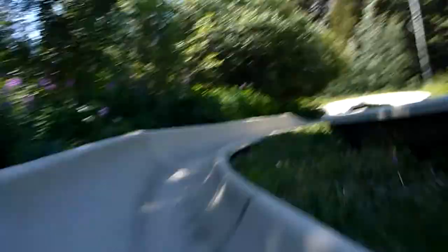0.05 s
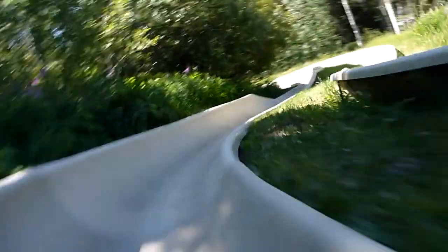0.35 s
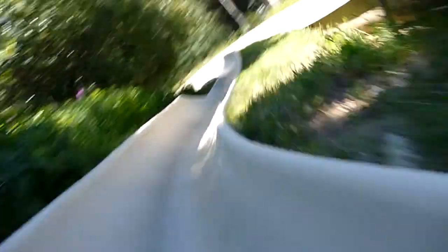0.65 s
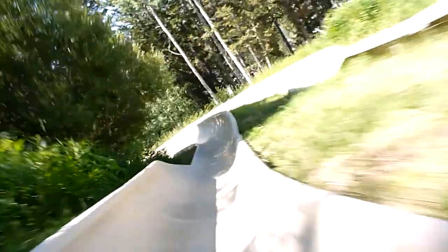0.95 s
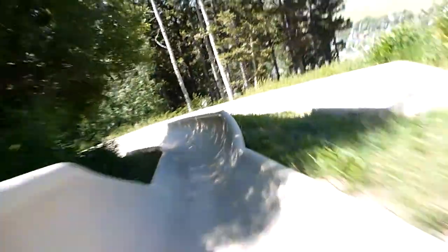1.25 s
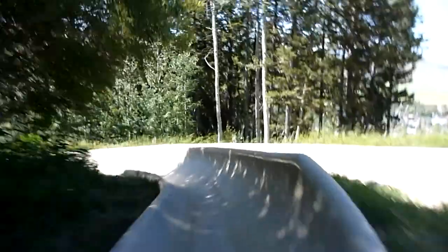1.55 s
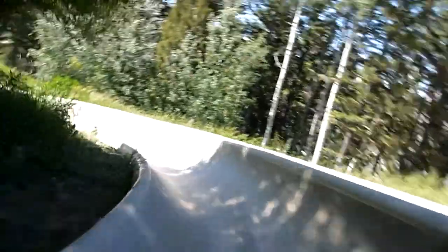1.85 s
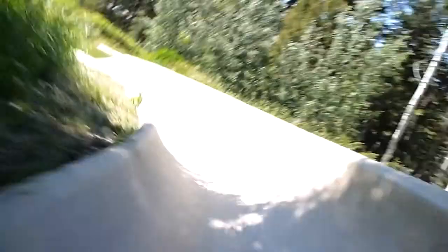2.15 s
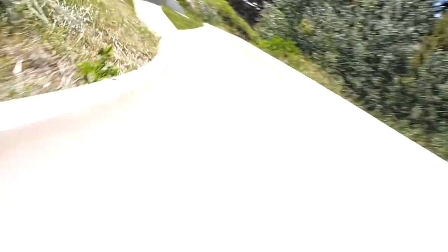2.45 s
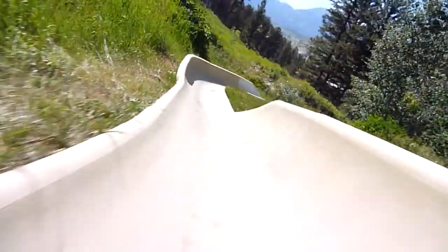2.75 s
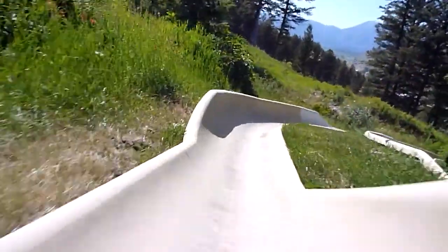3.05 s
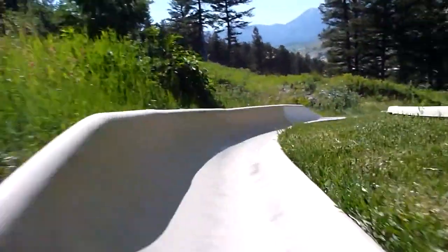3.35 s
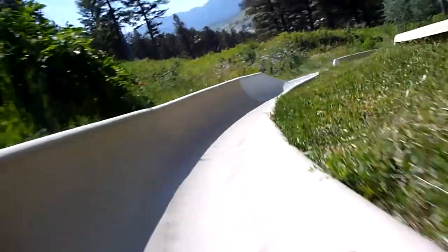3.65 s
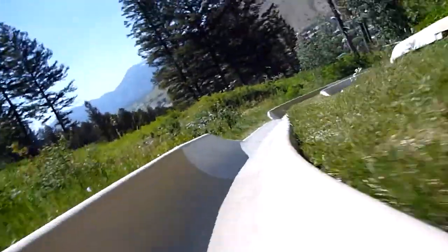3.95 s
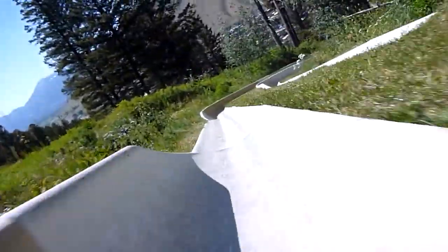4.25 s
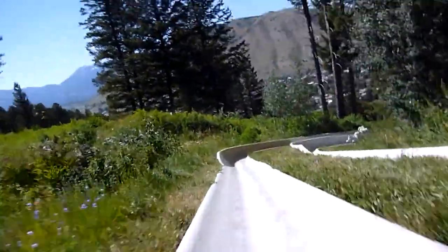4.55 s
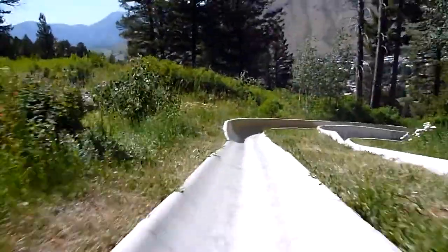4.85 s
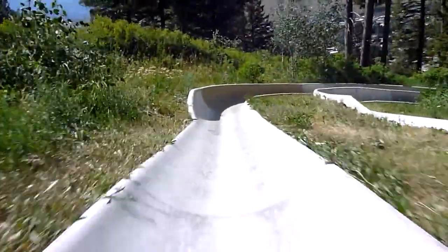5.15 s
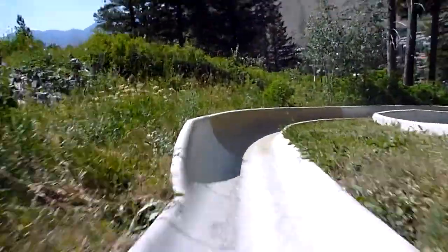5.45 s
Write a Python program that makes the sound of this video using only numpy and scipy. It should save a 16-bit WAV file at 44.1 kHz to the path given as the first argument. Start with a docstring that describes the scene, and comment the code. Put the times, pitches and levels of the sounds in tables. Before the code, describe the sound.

Wheels roll over a rough hillside track with a continuous, fluttering rumble that shakes a sled's plastic shell. Quick double knocks mark the joints at a fairly even pace. Early on, the wheels rub the wall in brief thin squeaks; around the middle and again later, the frame smacks the track and fittings clink. The microphone rides at the seat, catching soft low wind gusts as the wheels' drone rises toward the end.

```python
"""Wheels rumble and roar on grit: a sled runs down a trough-shaped hillside track, heard from the seat.
Rolling over the rough surface shakes the wheels and the plastic shell. Each joint is an impact: the
front wheels clack, the rear wheels thump and the seat rebounds; at the roughest, the frame slaps the
track. Metal fittings clink, and stick-slip friction squeals against the wall of the trough.
Behind it all, turbulent wind buffets the microphone and a thin whine comes and goes."""
import sys
import numpy as np
from scipy import signal
from scipy.fft import rfft, irfft
from scipy.io import wavfile

SR = 44100
rng = np.random.default_rng(int(sys.argv[2]) if len(sys.argv) > 2 else 0)


def output_pcm(signal):
    """Save a mono or channel-first signal as 16-bit PCM at the path in sys.argv[1].

    Samples are clipped to [-1, 1] before scaling.
    """
    pcm = np.clip(np.atleast_2d(signal).T, -1, 1) * 32767
    wavfile.write(sys.argv[1], SR, np.round(pcm).astype(np.int16))


N = 242991
TIME = np.arange(N) / SR
IMPACT_TIME = np.arange(4096) / SR


def gain_of(db):
    """Amplitude ratio of a level in decibels."""
    return 10 ** (np.asarray(db) / 20)


def unit_rms(x):
    """Power normalisation to rms 1."""
    return x / np.sqrt(np.mean(x ** 2) + 1e-20)


def burst(x):
    """Energy normalisation: an impact carries as much as rms 1 held for 20 ms."""
    return x / np.sqrt(np.sum(x ** 2) / (.02 * SR) + 1e-20)


def decay(t60):
    """Exponential damping: 60 dB down after t60 seconds."""
    return gain_of(-60 * IMPACT_TIME / t60)


def envelope(rows, column=1):
    """Amplitude envelope, interpolated in decibels from one column of a table."""
    rows = np.asarray(rows)
    return gain_of(np.interp(TIME, rows[:, 0], rows[:, column]))


def add(mix, start_s, sound):
    """Superposition of a sound on the mix."""
    part = mix[max(round(start_s * SR), 0):][:len(sound)]
    part += sound[:len(part)]


def coloured(x, spectrum):
    """Minimum-phase filtering by a spectrum of (frequency [Hz], gain [dB]) points."""
    hz, db = np.transpose(spectrum)
    f = abs(np.fft.fftfreq(len(IMPACT_TIME), 1 / SR))
    log_gain = np.log(gain_of(np.interp(np.log(f + 1), np.log(hz), db)))
    taps = np.fft.ifft(np.exp(np.conj(signal.hilbert(log_gain)))).real
    return signal.oaconvolve(x, taps)[:len(x)]


def band(x, hz, spread, order=1):
    """Band-pass filtering from hz / (1 + spread) to hz * (1 + spread)."""
    edges = np.clip([hz / (1 + spread), hz * (1 + spread)], 1, SR / 2 - 1)
    return signal.sosfilt(signal.butter(order, edges, "band", fs=SR, output="sos"), x)


def cutoff(x, hz, order, kind="low"):
    """Low-pass or high-pass filtering with a flat passband."""
    return signal.lfilter(*signal.butter(order, hz, kind, fs=SR), x)


def drift(hz):
    """Random modulation: low-passed noise of rms 1."""
    f = np.fft.rfftfreq(N, 1 / SR)
    return unit_rms(irfft(rfft(rng.standard_normal(N)) * np.exp(-(f / hz) ** 2), N))


def grains(per_s, spread_db):
    """Shot noise: randomly timed clicks of unequal size."""
    size = gain_of(spread_db * np.minimum(rng.exponential(1, N), 4))
    return unit_rms(size * rng.choice([-1, 1], N) * (rng.random(N) < per_s / SR))


def resonance(hz, width_hz):
    """A noise-driven resonance of rms 1 whose centre follows the curve hz."""
    pole = np.exp(-2 * np.pi * width_hz / SR)
    amplitude = rng.standard_normal(len(hz)) + 1j * rng.standard_normal(len(hz))
    for _ in range(2):
        amplitude = signal.lfilter([1 - pole], [1, -pole], amplitude)
    carrier = np.exp(2j * np.pi * np.cumsum(hz) / SR)
    return unit_rms((amplitude * carrier).real)


def rub(length_s, db, hz, width_hz, glide=0):
    """Friction drives a resonance that swells and dies, its pitch rising from -glide to +glide of hz."""
    progress = np.linspace(-1, 1, int(length_s * SR))
    swell = np.cos(np.pi * progress / 2)
    return gain_of(db) * swell * resonance(hz * (1 + glide * progress), width_hz)


def contact(chatter, t60):
    """Contact force: an impulse at first touch, then decaying random chatter."""
    impulse = IMPACT_TIME == 0
    tail = rng.standard_normal(len(IMPACT_TIME)) * decay(t60)
    return chatter * tail / np.linalg.norm(tail) - impulse


# spells of the whine: (start [s], duration [s], relative level [dB], frequency [Hz])
WHINE_SPELLS = [(1.6, 0.16, -76, 10850), (2.16, 0.13, -69, 10900), (3.12, 0.24, -74, 10740),
                (3.28, 0.24, -73, 10760), (3.5, 0.22, -78, 10700), (3.67, 0.087, -75, 10920),
                (4.42, 0.3, -77, 10850), (4.76, 0.18, -77, 10820)]

def whine():
    """Narrow-band treble noise wavers and flickers by random frequency and amplitude modulation."""
    out = np.zeros(N)
    fade_s = 0.064
    waver_hz = 40 * drift(hz=17)
    for start, length, db, hz in WHINE_SPELLS:
        t = np.arange(0, length, 1 / SR)
        fade = np.minimum(np.minimum(t, length - t) / fade_s, 1)
        pitch_hz = hz + np.interp(start + t, TIME, waver_hz)
        add(out, start, gain_of(db) * fade * resonance(pitch_hz, width_hz=220))
    return out * gain_of(2.2 * drift(hz=70) + 3.0)


# tones of the wheels: (frequency [Hz], width [Hz], level [dB])
WHEEL_TONES = [(3480, 100, -62), (6500, 250, -66), (11500, 3000, -73)]

def singing_wheels():
    """Resonances of the wheels sing faintly at steady pitch on the fast straight."""
    out = np.zeros(N)
    middle_s, length_s = 5.28, 0.84
    for hz, width_hz, db in WHEEL_TONES:
        add(out, middle_s - length_s / 2, rub(length_s, db, hz, width_hz))
    return out


# airflow, growing as the sled gathers speed: (time [s], relative level [dB])
WIND_LEVELS = [(0.0, -46), (1.2, -52), (1.9, -44), (3.7, -38.5), (4.7, -42.5), (5.2, -40), (5.51, -40.5)]
# spectrum of the eddies: (frequency [Hz], relative density [dB])
EDDY_SPECTRUM = [(10, -25), (25, -12.5), (55, -7), (90, -9.5), (130, -8), (250, -34), (1500, -81)]

def wind():
    """Turbulence at the microphone makes low pressure fluctuations, in random gusts."""
    eddies = unit_rms(coloured(rng.standard_normal(N), EDDY_SPECTRUM))
    gusts = gain_of(3.5 * drift(hz=8.5) + 3.0)
    return envelope(WIND_LEVELS) * eddies * gusts


# wheels rubbing the wall, about once a turn in the bends:
# (midpoint [s], duration [s], relative level [dB], frequency [Hz], width [Hz])
WALL_RUBS = [(0.091, .05, -49, 5500, 2000), (0.158, 0.026, -48, 5000, 1510),
             (0.312, 0.04, -42.5, 4900, 800), (0.393, 0.046, -39, 5050, 350),
             (0.429, .04, -39.5, 5370, 1100), (0.463, 0.033, -36, 8900, 1100),
             (0.487, 0.032, -38.5, 9300, 1200), (0.492, .028, -39, 12600, 1600),
             (0.605, 0.036, -38, 5330, 1420), (0.652, 0.042, -40, 2210, 1500),
             (0.641, 0.026, -43, 11300, 3500), (0.69, .045, -38, 4600, 450),
             (0.734, 0.063, -42.5, 5150, 350), (0.764, 0.026, -33, 5900, 800),
             (0.763, 0.024, -36.5, 8200, 1700), (0.816, 0.015, -30, 5600, 4500),
             (0.838, 0.04, -35, 5000, 3400), (0.957, 0.046, -38.5, 4580, 553),
             (1.034, 0.036, -35.5, 4850, 750), (1.065, 0.046, -45, 5000, 500),
             (1.106, 0.035, -40, 5730, 1000), (1.151, 0.03, -42, 5970, 2500),
             (1.184, 0.039, -36, 7800, 2000), (1.478, 0.073, -43, 5180, 997),
             (1.512, 0.13, -50, 9000, 4500), (1.73, 0.16, -44.5, 4990, 1100),
             (2.106, 0.052, -43, 8350, 3460), (2.162, 0.035, -40, 5800, 3470),
             (2.236, 0.045, -39.5, 5200, 3000), (2.306, 0.036, -37, 5200, 2500),
             (2.371, 0.034, -40, 5400, 2500), (2.436, 0.032, -42, 5540, 2500),
             (2.498, 0.043, -44, 6120, 2000), (2.575, .034, -40.5, 5300, 2000),
             (2.646, 0.027, -39, 4900, 2010), (2.782, 0.022, -49, 6500, 1200),
             (2.848, .022, -38.5, 5700, 1900), (2.928, 0.035, -46, 5000, 2000),
             (3.02, 0.028, -41.5, 5000, 4000), (3.908, 0.11, -45, 8000, 4450),
             (4.272, 0.052, -41.5, 5500, 4993)]
# short bright snaps, on the joint impacts and between them: (time [s], level [dB])
BRIGHT_SNAPS = [(0.1965, -68), (0.2317, -63), (0.811, -57), (0.836, -58), (0.9405, -63), (1.924, -70),
                (2.153, -60), (3.041, -60), (3.091, -59), (3.35, -57), (3.358, -63), (4.378, -58),
                (4.703, -54)]

def scuffs():
    """Stick-slip friction on the wall gives short rising squeals over a scrape; bright snaps join them."""
    out = np.zeros(N)
    for middle, length, db, hz, width_hz in WALL_RUBS:
        scrape = rub(length, db - 9, hz=5600, width_hz=2200)
        squeal = rub(length, db, hz, width_hz, glide=0.05)
        add(out, middle - length / 2, squeal + scrape)
    out *= gain_of(2.1 * drift(hz=400) - 8.0)  # the gritty surface catches and lets go
    # soft wheels radiate little in the bass or at the very top
    out = coloured(out, [(1500, -7), (3500, 7.5), (6500, 1.0), (9500, -4.0), (13000, -7.5), (16000, -20)])
    for time, db in BRIGHT_SNAPS:
        snap = band(contact(chatter=3.0, t60=0.037), hz=10000, spread=0.35)
        add(out, time, gain_of(db) * burst(snap))
    return out


# jolted metal fittings: (time [s], level [dB], frequency [Hz])
FITTING_CLINKS = [(0.233, -48, 2196), (1.884, -42.5, 1840), (2.4254, -34.5, 2110), (3.0485, -31, 2080),
                  (3.978, -31, 2091), (3.978, -37, 3320), (4.342, -40.5, 3015), (4.7, -36.5, 2070)]

def clinks():
    """Damped free vibration: each metal fitting rings in one mode and rattles as it dies."""
    out = np.zeros(N)
    for time, db, hz in FITTING_CLINKS:
        ring = decay(t60=0.023) * np.sin(2 * np.pi * hz * IMPACT_TIME)
        rattled = signal.fftconvolve(contact(chatter=0.26, t60=0.023), ring)
        add(out, time, gain_of(db) * burst(band(rattled, hz, spread=0.42, order=2)))
    return out


# frame hitting the roughest joints: (time [s], smack level [dB], smack centre [Hz], panel level [dB])
FRAME_SLAPS = [(0.2335, -31.5, 616, -32), (0.5515, -39.5, 1050, -49), (2.152, -30.5, 1100, -25),
               (2.4243, -19.5, 1400, -24), (3.3015, -35.5, 1200, -31), (3.9775, -24.5, 1600, -21.5)]

def slaps():
    """Impact excitation: the frame smacks the track, and the panel beneath rings in one hollow mode."""
    out = np.zeros(N)
    panel_hz = 744
    panel = burst(decay(t60=0.038) * np.sin(2 * np.pi * panel_hz * IMPACT_TIME))
    for time, smack_db, hz, panel_db in FRAME_SLAPS:
        smack = band(contact(chatter=1.0, t60=0.024), hz, spread=0.51)
        smack = burst(cutoff(smack, hz=2260, order=6))
        add(out, time, gain_of(smack_db) * smack + gain_of(panel_db) * panel)
    return out


# modes of the plastic shell: (frequency [Hz], bandwidth [Hz], gain [dB])
SHELL_MODES = [(393, 150, 16), (597, 78, 1), (669, 89, 0), (820, 40, -2.5), (1060, 180, -5),
               (1352, 160, -4.5), (1900, 360, -3), (2420, 71, -42)]

def shell(force):
    """Modal superposition: the shell responds to a force as a sum of damped resonators."""
    return sum(gain_of(db) * signal.lfilter(*signal.iirpeak(hz, hz / width, SR), force)
               for hz, width, db in SHELL_MODES)


def panel_swell():
    """Amplitude modulation, one cycle a track panel: 1 just past each joint, -1 half a panel later."""
    times = [row[0] for row in JOINTS]
    times = [2 * times[0] - times[1], *times, 2 * times[-1] - times[-2]]  # one more panel at each end
    panels_passed = np.interp(TIME, times, np.arange(len(times)))
    return np.cos(2 * np.pi * (panels_passed - 0.12))


# relative levels of the steady ride: (time [s], shell rumble [dB], wheel roar [dB], sliding hiss [dB])
RIDE_LEVELS = [(0.0, -34, -41.5, -45.5), (0.31, -29.5, -37.5, -50.5), (0.36, -35.5, -41, -49),
               (0.5, -30.5, -39, -49), (0.57, -32.5, -40.5, -50), (0.61, -28, -32.5, -46),
               (0.68, -26.5, -32.5, -46), (0.73, -25.5, -37, -43), (1.05, -28.5, -39.5, -47),
               (1.2, -25.5, -33.5, -43), (1.42, -27, -38, -46), (1.55, -26, -34, -41.5),
               (1.7, -25.5, -37.5, -52), (1.87, -28.5, -37.5, -49), (2.16, -26.5, -35, -45.5),
               (2.34, -27.5, -31.5, -48.5), (2.62, -29.5, -32, -52), (2.8, -30, -31.5, -51),
               (2.95, -27.5, -30.5, -46), (3.13, -29.5, -33, -48.5), (3.22, -23.5, -30, -50),
               (3.42, -28.5, -34.5, -49.5), (3.62, -29, -33, -50), (3.75, -31, -36, -49.5),
               (3.92, -28, -32.5, -46), (4.16, -32, -40, -47.5), (4.4, -27, -33.5, -47),
               (4.65, -33.5, -32.5, -50.5), (4.88, -27, -33, -52.5), (4.96, -33, -36, -52.5),
               (5.04, -30, -31.5, -51.5), (5.12, -26, -31, -45), (5.3, -25.5, -33.5, -51),
               (5.51, -29, -29.5, -49)]
# the wheels' drone, higher at speed: (time [s], frequency [Hz], amplitude against the bumps [ratio])
WHEEL_DRONE = [(0, 226, 1.38), (0.999, 164.3, 0.45), (1.9, 158.4, 0.3), (2.797, 242.7, 0.48),
               (3.6, 213.9, 0.96), (4.399, 270.5, 0.65), (4.95, 316.4, 1.64), (5.2, 295.3, 1.3),
               (5.51, 344, 0.75)]
# spectra of shell rumble, wheel roar and sliding hiss: (frequency [Hz], relative density [dB])
RUMBLE_SPECTRUM = [(30, -26.5), (60, -9.5), (100, -3.5), (135, -1), (200, 0), (260, 2), (330, -1),
                   (420, -9), (600, -25.5), (1200, -77), (3000, -73.5)]
ROAR_SPECTRUM = [(60, -46.5), (250, -9.5), (420, 2), (540, 3.5), (700, 1), (1000, -4.5), (1350, -9),
                 (1650, -11.5), (2050, -15.5), (2500, -22), (3300, -27.5), (6000, -65), (10000, -98)]
HISS_SPECTRUM = [(1500, -5), (2600, -2.5), (3400, 3), (5000, 0), (6400, -5.5), (7500, -14.5), (8800, -12),
                 (10000, -22), (12500, -18.5), (14500, -30), (16000, -27)]

def rolling():
    """Roughness excitation: bumps and grit shake wheels and shell, modulated by the fluttering load."""
    load = drift(hz=42.6)
    times, drone_hz, strength = np.transpose(WHEEL_DRONE)
    drone = np.interp(TIME, times, strength) * resonance(np.interp(TIME, times, drone_hz), width_hz=94)
    bumps = unit_rms(coloured(grains(per_s=1700, spread_db=1.5), RUMBLE_SPECTRUM))
    rumble = unit_rms(bumps + drone) * gain_of(load - 0.44)
    grit = unit_rms(coloured(grains(per_s=3000, spread_db=0.5), ROAR_SPECTRUM))
    knocking = shell(grains(per_s=300, spread_db=-5.0))
    knocking = unit_rms(band(knocking, hz=840, spread=2.1, order=2))
    roar = unit_rms(grit + 0.23 * knocking) * gain_of(2.23 * load + 1.0)
    hiss = unit_rms(coloured(rng.standard_normal(N), HISS_SPECTRUM)) * gain_of(2.2 * load - 3.0)
    swell = panel_swell()
    return (rumble * envelope(RIDE_LEVELS, column=1) * gain_of(0.77 * swell)
            + roar * envelope(RIDE_LEVELS, column=2) * gain_of(0.33 * swell)
            + hiss * envelope(RIDE_LEVELS, column=3))


def boom(db, hz, swell_s, ring_share, ring_t60):
    """A mass on a spring: the loaded sled bounces on its wheels in one big swing, then a weaker ring."""
    swing = (IMPACT_TIME / swell_s * np.exp(1 - IMPACT_TIME / swell_s)) ** 2
    onset = 1 - np.exp(-IMPACT_TIME / 0.00007)
    ring = ring_share * onset * decay(ring_t60)
    bounce = (swing + ring) * np.sin(2 * np.pi * hz * IMPACT_TIME)
    sway_gain = 0.61 * gain_of(1.2 * (db + 10.5))  # heavy landings set the trough itself swaying
    sway = sway_gain * onset * decay(t60=0.13) * np.sin(2 * np.pi * 156 * IMPACT_TIME)
    return gain_of(db) * burst(cutoff(bounce + sway, hz=117, order=2, kind="high"))


# spectrum of a hard contact: (frequency [Hz], relative density [dB])
CRACK_SPECTRUM = [(1500, -12), (2600, 5), (3800, 3), (6300, -2), (8000, -7), (10500, -10), (13500, -8),
                  (15500, -13)]

def crack(db, top_hz, chatter, t60):
    """A brief contact has a broad spectrum: the bright edge of a blow, with chatter after it."""
    edge = cutoff(contact(chatter=0.86, t60=0.014), top_hz, order=2)
    tail = cutoff(contact(chatter, t60), min(top_hz, 6500), order=2)
    return gain_of(db) * burst(coloured(edge + 0.54 * tail, CRACK_SPECTRUM))


def rebound(db):
    """Elastic recoil: the seat springs back with a round note and a faint rattle of the shell."""
    shake = contact(chatter=14.0, t60=0.11) * (1 - np.exp(-IMPACT_TIME / 0.004))
    rattle = gain_of(db - 11) * burst(band(shell(shake), hz=726, spread=0.96))
    return boom(db, hz=247.5, swell_s=0.007, ring_share=0.076, ring_t60=0.35) + rattle


def thump(db, hz, crack_db):
    """A soft impact favours low frequencies: mostly boom, with a short scrape at the deepest point."""
    out = boom(db, hz, swell_s=0.0031, ring_share=0.32, ring_t60=0.1)
    ring_db = -29 + 0.4351 * (crack_db + 54)  # the shell's ring grows with the crack
    ring = band(shell(contact(chatter=5.9, t60=0.068)), hz=535, spread=1.0)
    scrape = crack(crack_db, top_hz=12000, chatter=7.4, t60=0.062)
    add(out, 0.0018, gain_of(ring_db) * burst(ring) + scrape)
    return out


def clack(ring_db, boom_db, crack_db, ring_hz, top_hz):
    """A hard impact excites a wide band: a wheel strikes an edge with a crack, shell ring and boom."""
    ring = band(shell(contact(chatter=2.4, t60=0.047)), ring_hz, spread=0.38)
    ring = gain_of(ring_db - 3.0) * burst(cutoff(ring, hz=2350, order=6))
    low = boom(boom_db, hz=260, swell_s=0.003, ring_share=0.088, ring_t60=0.29)
    return low + ring + crack(crack_db + 0.45, top_hz, chatter=4.2, t60=0.048)


# track joints, levels relative: (time [s], clack ring [dB], clack boom [dB], clack crack [dB],
# ring centre [Hz], crack top [Hz], rear wheels' lag [s], thump boom [dB], thump frequency [Hz],
# thump crack [dB], rebound [dB], rebound's lag after the thump [s])
JOINTS = [(0.198, -32, -31, -49, 1030, 5000, 0.032, -13, 207, -41.5, -36, 0.049),
          (0.5507, -20.5, -44, -50, 750, 4000, 0.036, -25, 217, -56, -37, 0.052),
          (0.903, -28.5, -34, -50, 920, 4000, 0.0338, -11.5, 213, -44.5, -28, 0.06),
          (1.2396, -14.5, -33, -37.5, 520, 5030, 0.044, -20, 196, -53, -17, 0.05),
          (1.563, -20.5, -30, -34.5, 890, 4250, 0.04, -15, 228, -43, -20.5, 0.058),
          (1.886, -30, -40, -65, 1130, 3000, 0.037, -11.5, 214, -41.5, -33, 0.047),
          (2.152, -15, -18.5, -40.5, 755, 13000, 0.041, -23.5, 250, -53, -22, 0.051),
          (2.4244, -17, -18.5, -37, 810, 13000, 0.042, -17, 222, -56, -27.5, 0.055),
          (2.7021, -27.5, -26.5, -47, 1060, 5000, 0.038, -15.5, 214, -56, -25, 0.052),
          (2.9856, -17, -43, -37.5, 694, 5700, 0.028, -42, 230, -83, -42, 0.065),
          (3.3, -20, -22.5, -49, 630, 13000, 0.043, -25, 222, -47.5, -42, 0.052),
          (3.633, -54, -45, -65, 900, 3000, 0.038, -19, 209, -58, -25.5, 0.053),
          (3.9775, -16.5, -16.5, -33, 754, 12500, 0.042, -14.5, 217, -47, -17.5, 0.052),
          (4.3406, -26, -42, -44, 913, 4500, 0.036, -24.5, 254, -51, -48, 0.084),
          (4.7007, -26, -27, -42, 1320, 16000, 0.027, -30, 240, -50, -48, 0.052),
          (4.9874, -22, -30, -47.5, 899, 5000, 0.031, -19, 260, -52, -28, 0.052),
          (5.335, -27.5, -31, -47, 960, 9030, 0.044, -33, 275, -65, -31, 0.052)]
# extra knocks and rattles, at the joints and between them, levels relative:
# (time [s], ring [dB], boom [dB], crack [dB], ring centre [Hz], crack top [Hz])
EXTRA_KNOCKS = [(0.617, -29.5, -37, -44, 910, 4000), (0.646, -23.5, -42, -39.5, 840, 4000),
                (0.668, -27, -28, -42.5, 1050, 4000), (0.996, -29.5, -40, -54, 696, 3000),
                (1.574, -39, -34, -43, 700, 4300), (1.647, -30, -40, -52, 775, 3500),
                (1.985, -28, -33, -45, 930, 4500), (3.0467, -34, -45, -41.5, 1567, 5000),
                (3.184, -26, -37, -70, 714, 3000), (4.778, -32, -36, -63, 1190, 3485),
                (4.83, -25, -34, -49.5, 880, 3000), (5.08, -29.5, -27, -48, 900, 4000),
                (5.377, -24.5, -42, -56, 760, 3000)]

def wheel_impacts():
    """Impact noise at discontinuities: front clack, rear thump and rebound per joint, and extra knocks."""
    out = np.zeros(N)
    for time, *front, rear_lag, thump_db, thump_hz, crack_db, rebound_db, rebound_lag in JOINTS:
        add(out, time, clack(*front))
        add(out, time + rear_lag, thump(thump_db, thump_hz, crack_db))
        add(out, time + rear_lag + rebound_lag, rebound(rebound_db))
    for time, *knock in EXTRA_KNOCKS:
        add(out, time, clack(*knock))
    return out


def scene():
    """Linear superposition of all sources at the rider's seat, in one channel."""
    sled = rolling() + wheel_impacts() + slaps() + clinks() + scuffs() + singing_wheels()
    return (sled + whine() + wind())[None]


def record(dry):
    """Soft saturation rounds the highest peaks; two narrow notches and a band limit shape the treble."""
    out = dry / (1 + abs(dry / .95) ** 6) ** (1 / 6)
    for hz, width_hz in [(2910, 210), (7830, 170)]:
        out = signal.lfilter(*signal.iirnotch(hz, hz / width_hz, SR), out)
    band_limit = signal.firwin(511, 15750, window=("kaiser", 9), fs=SR)
    return signal.oaconvolve(out, band_limit[None], "same")


dry = scene()
out = record(dry)
output_pcm(out)
```